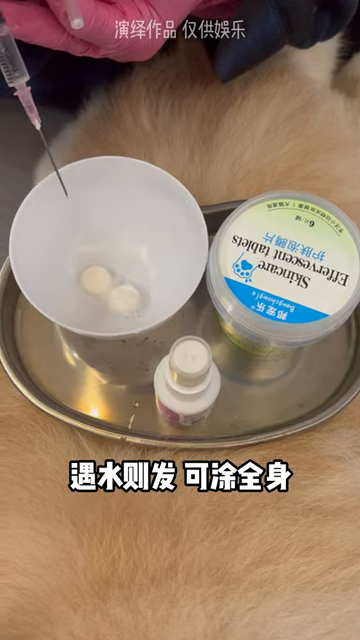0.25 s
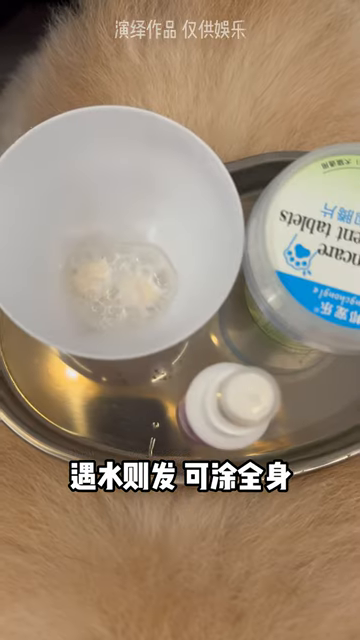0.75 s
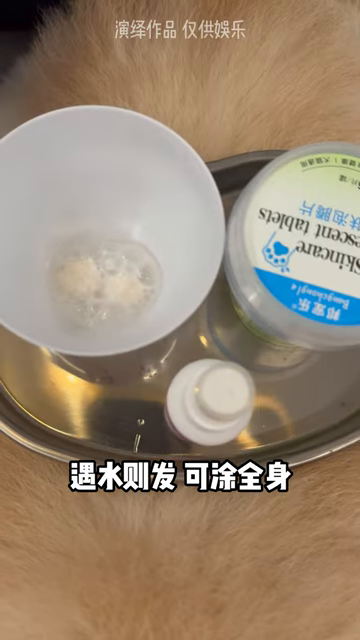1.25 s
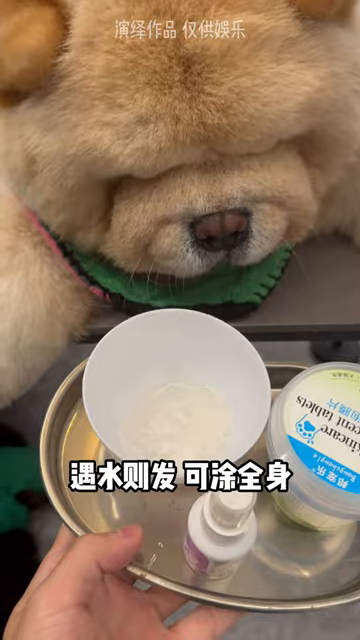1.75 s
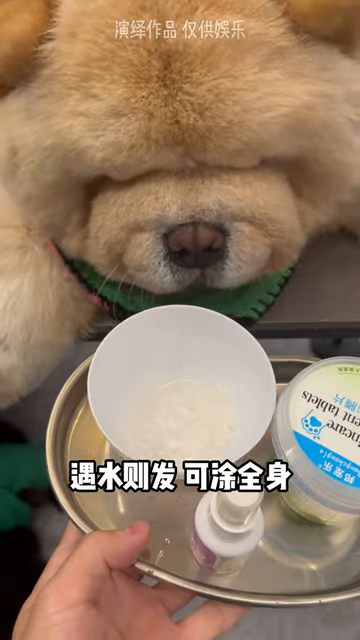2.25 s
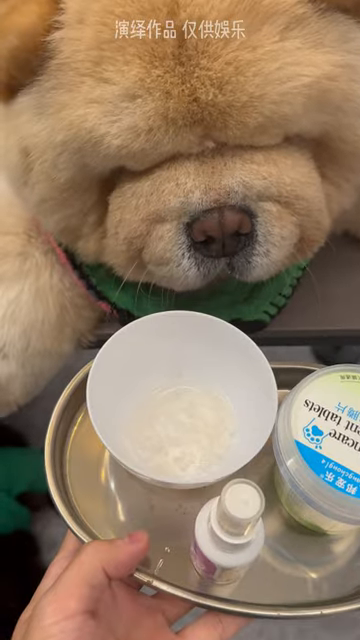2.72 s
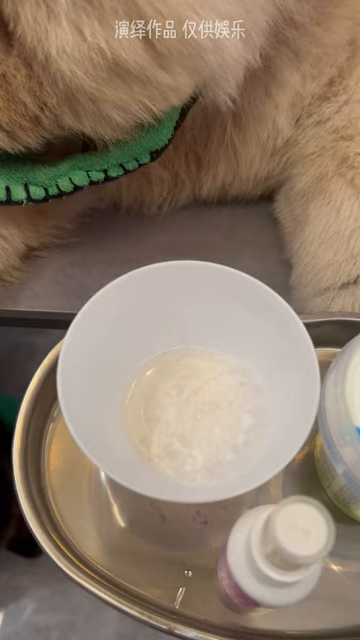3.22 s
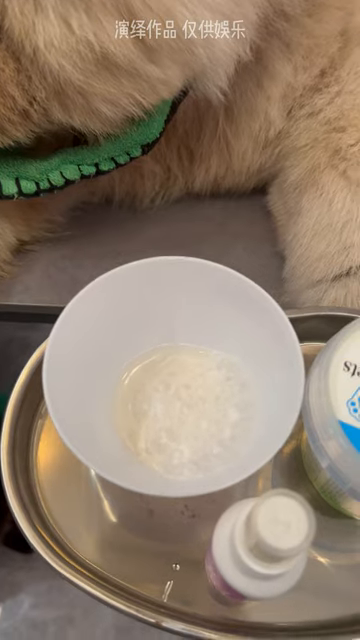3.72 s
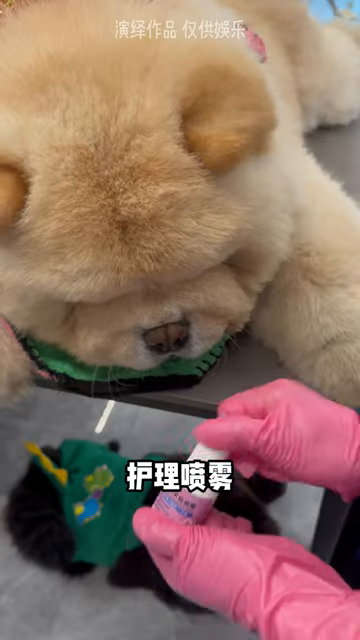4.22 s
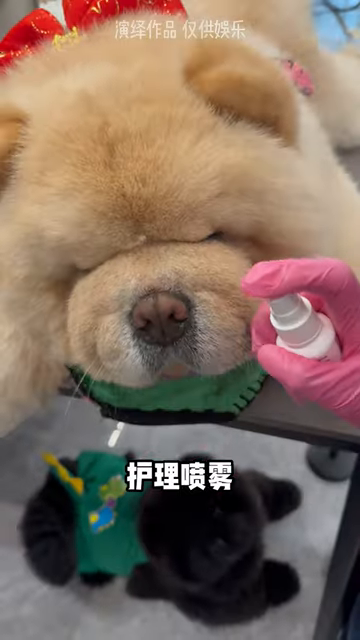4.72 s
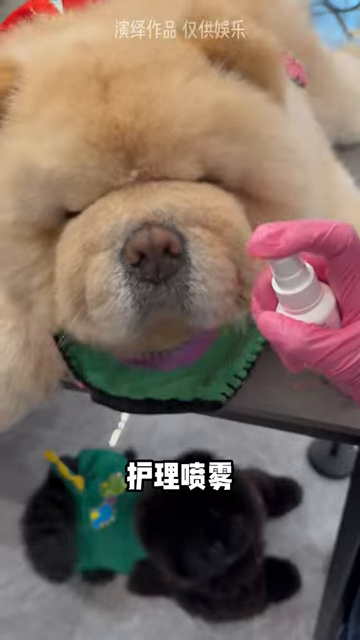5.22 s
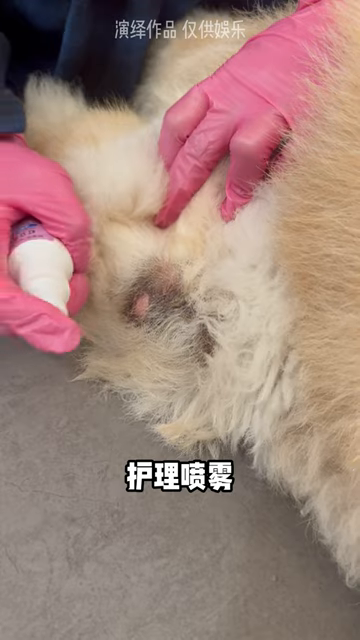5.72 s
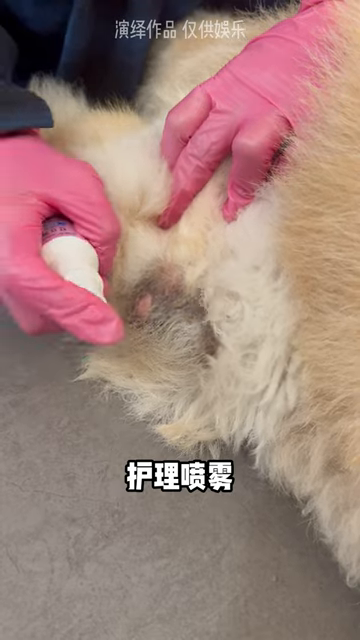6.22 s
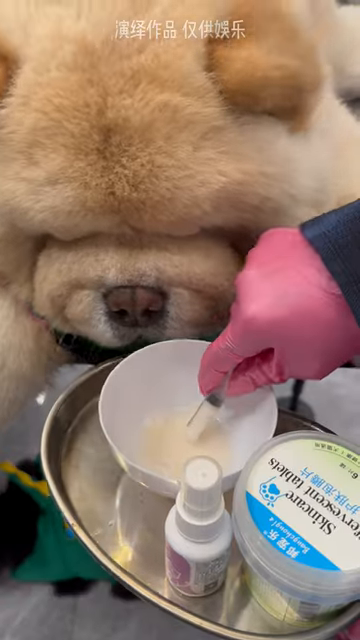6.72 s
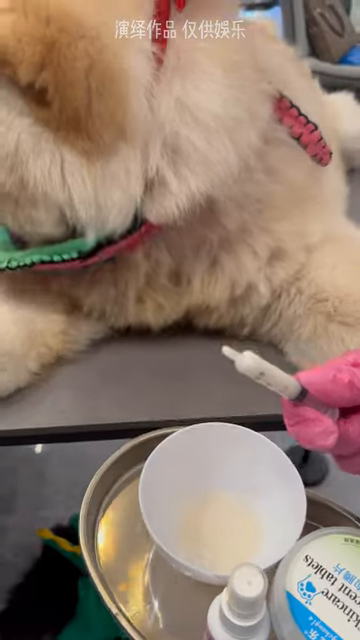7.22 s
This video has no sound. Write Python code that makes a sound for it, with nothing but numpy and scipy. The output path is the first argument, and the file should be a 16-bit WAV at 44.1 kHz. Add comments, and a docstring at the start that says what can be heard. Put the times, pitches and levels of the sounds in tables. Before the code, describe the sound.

Tablets fizz briskly in a shallow plastic bowl close to a hand-held stereo microphone, with low air buffeting, fan hum and faint dog grunts. The fizz weakens over abrupt shot changes. Then, in a quieter, slightly reverberant room, a bottle cap cracks loose, a pump gives four short puffs with small clicks, gloves rustle, and a low thump precedes a sputtering, gurgling syringe squirt.

```python
"""Tablets fizz in a shallow plastic bowl close to a hand-held stereo microphone, in several joined shots.
Air buffets the ports, a fan washes and hums behind, and a dog grunts; the fizz is random clicks, coloured.
Then, in a quieter room: a bottle cap snaps (noise blows ringing plastic modes), a pump bottle sprays four
puffs of mist (shaped noise), gloves rustle (scratchy grains), and after a low thump a syringe squirts
liquid and air into the bowl (ringing froth, single bubbles and low gurgles)."""
import sys
import numpy as np
from scipy import signal
from scipy.fft import rfft, irfft
from scipy.io import wavfile
from scipy.ndimage import uniform_filter1d

SR = 44100
rng = np.random.default_rng(int(sys.argv[2]) if len(sys.argv) > 2 else 0)


def unload_audio(sound):
    """Save the sound as a 16-bit wav file, at the path given as the first command line argument."""
    columns = np.transpose(np.atleast_2d(sound))
    # keep every value between -1 and 1, then stretch to whole-number steps
    steps = np.round(np.clip(columns, -1, 1) * 32767)
    wavfile.write(sys.argv[1], SR, steps.astype(np.int16))


def gain_from_db(level_db):
    """Convert decibel levels to linear amplitude factors (20 dB per decade)."""
    decades = np.asarray(level_db, float) / 20
    return 10 ** decades


N = 328941
T = np.arange(N) / SR

# Joins between shots, the louder room up to the third. Each entry: time in seconds.
JOINS = [.691, 1.9, 3.696, 3.99, 4.625, 6.458, 7.022, 7.199]


def evened(x):
    """Scales to rms 1."""
    return x / np.sqrt(np.mean(x ** 2) + 1e-20)


def read(points, hz):
    """Reads a table on a log-frequency axis."""
    f, value = np.transpose(points)
    return np.interp(np.log(hz + 1), np.log(f + 1), value)


def span(rows):
    """Sample times of a curve table and its columns at those times."""
    s, *columns = np.transpose(rows)
    t = np.arange(s[0], s[-1], 1 / SR)
    return (t, *(np.interp(t, s, c) for c in columns))


def add(mix, s, sound):
    """Adds a sound at time s."""
    part = mix[..., round(s * SR):][..., :sound.shape[-1]]
    part += sound[..., :part.shape[-1]]


def slow(count, size):
    """Slow random drift of rms 1."""
    return evened(uniform_filter1d(rng.standard_normal(count), size=size))


def patchy(depth_db, frames, bins):
    """A field of random louder and softer patches over time and frequency."""
    def field(hz, s):
        chance = rng.standard_normal((len(s), len(hz)))
        over_time = uniform_filter1d(chance, size=frames, axis=0)
        return depth_db * evened(uniform_filter1d(over_time, size=bins, axis=1)).T
    return field


def pops(count, per_s, spread_db):
    """Two trains of random clicks; a positive spread makes a few much larger than the rest."""
    size = gain_from_db(spread_db * np.minimum(rng.exponential(1, (2, count)), 5))
    struck = rng.random((2, count)) < per_s / SR
    return evened(size * rng.standard_normal((2, count)) * struck)


def pair(drive, colour, same, size=512, field_db=None):
    """Colours two drives and mixes them to left and right with the given likeness."""
    hz, t, z = signal.stft(drive, SR, nperseg=size, noverlap=size * 3 // 4)
    same = np.clip(read(same, hz), -.9, 1)[:, None]
    wide = np.array([np.ones_like(same), np.sqrt((1 - same) / (1 + same))])
    colour_db = read(colour, hz)[:, None]
    if field_db:
        colour_db = colour_db + field_db(hz[:, None], t)
    mid, side = z * wide * gain_from_db(colour_db)
    out = signal.istft(np.array([mid + side, mid - side]), SR, nperseg=size, noverlap=size * 3 // 4)[1]
    out = out[:, :drive.shape[1]]
    return out / np.sqrt(np.mean(out.mean(0) ** 2))


def resonate(x, hz, width):
    """A resonance of gain 1 that follows the curve hz."""
    turn = np.exp(2j * np.pi * np.cumsum(hz * np.ones(x.shape[-1])) / SR)
    r = np.exp(-np.pi * width / SR)
    return 2 * (turn * signal.lfilter([1 - r], [1, -r], x / turn)).real


def lead(x, s):
    """Makes the left channel earlier than the right by s seconds."""
    turn = np.exp(1j * np.pi * np.fft.rfftfreq(x.shape[1], 1 / SR) * s)
    return irfft(rfft(x) * [turn, 1 / turn], x.shape[1])


# The bowl held near, nearer, lifted and set down, one list a shot.
# Each row: time in seconds, fizz level in dB, lift of the treble in dB.
FIZZ_MOVES = [
    [(0, -28, 7), (.46, -23, -0.5), (.69, -23.5, -0.5)],
    [(.69, -23.5, -0.5), (1.2, -22.5, 0), (1.75, -22.5, -2)],
    [(1.75, -26, -2), (2.1, -29.5, -3), (2.97, -37.5, -1)],
    [(2.97, -39, 1), (3.2, -41, -1), (3.43, -45.5, -10), (3.47, -50, -3), (3.69, -50.5, -5),
     (3.70, -58.5, -0.5), (3.99, -58, -3)],
]
# Bubbles and bowl as heard at the microphone in each shot. Each row: frequency in Hz, level in dB per Hz.
FIZZ_COLOUR = [
    [(470, -59), (800, -24.5), (1320, -17), (2000, -5.5), (2380, -5), (3020, 1.5), (4180, 1), (11000, -10),
     (15200, -19), (16000, -33.5)],
    [(470, -54), (800, -26), (1080, -20.5), (1300, -13), (1950, -14.5), (2350, -5.5), (2700, -9.5),
     (3180, -1.5), (7000, -7), (10100, -5), (15200, -14.5), (16000, -38)],
    [(470, -39), (800, -19.5), (953, -23.5), (1180, -9), (1660, -14), (2000, -5.5), (2410, -8.5),
     (3470, -6.5), (4570, -6), (7000, -8.5), (9220, -0.5), (16000, -13.5)],
    [(530, -41.5), (900, -28), (1280, -2.5), (1700, -10), (1990, -8), (3230, -5.5), (3470, -5),
     (6800, -5.5), (9090, -0.5), (16000, -10)],
]
# Air modes of the bowl in each shot. Each row: frequency in Hz, width in Hz, lift in dB.
BOWL_MODES = [
    [(2053, 99, 4.5), (3080, 100, -1)],
    [(1300, 120, 1.5), (2500, 77, 6), (3040, 200, 5.5), (3660, 90, 4), (4170, 78, 6), (8430, 170, 4.5)],
    [(1170, 270, 2.5), (2000, 38, 4.5), (2500, 90, -1.5), (2900, 380, 5), (4050, 74.3, 0.5), (4900, 120, 0),
     (3520, 150, 10)],
    [(1990, 110, 4.5), (3430, 130, 3.5)],
]
# How much the fizz is shared by the two ports. Each row: frequency in Hz, likeness from -1 to 1.
FIZZ_SAME = [(60, -0.45), (180, 0.55), (550, 0.34), (1650, 0.9), (4970, 0.85), (9000, 0.57), (15000, 0.79)]
# Lean of the fizz. Each row: frequency in Hz, left over right in dB.
FIZZ_PAN = [(60, 2.0), (180, 1.0), (550, 2.0), (1650, -0.5), (4970, -0.42), (15000, 0.5)]
# The fizz reaches the left port first. Each entry, one a shot: lead in seconds.
FIZZ_LEAD = [0.000022, 0.000018, .5e-5, 1.1e-5]


def fizz():
    """Thousands of tiny bubbles burst each second; the bowl colours them, patches drift."""
    out = np.zeros((2, N))
    for rows, colour, modes, lead_s in zip(FIZZ_MOVES, FIZZ_COLOUR, BOWL_MODES, FIZZ_LEAD):
        t, db, treble_db = span(rows)

        def field(hz, s):
            treble = np.clip(np.log2(hz / 5000 + 1e-3), 0, 1)  # from 5 kHz, full at 10 kHz
            lift = np.interp(s + t[0], t, treble_db) * treble
            bowl = sum(lift_db / (1 + (2 * (hz - f) / width) ** 2) for f, width, lift_db in modes)
            return patchy(1.5, 12, 4)(hz, s) + lift + bowl
        bursts = pops(len(t), per_s=22000, spread_db=0)
        coloured = pair(bursts, colour, FIZZ_SAME, size=1024, field_db=field)
        add(out, t[0], gain_from_db(db) * lead(coloured, lead_s))
    hz = np.fft.rfftfreq(N, 1 / SR)
    lean = gain_from_db(read(FIZZ_PAN, hz) / 2)
    return irfft(rfft(out) * [lean, 1 / lean], N)


# Strength of the air on the ports. Each row: time in seconds, level in dB.
BUFFET = [(0.0, -20.5), (0.13, -29), (0.5, -30), (0.77, -18), (0.86, -31), (0.93, -21), (1.08, -23),
          (1.3, -30), (1.55, -25), (1.78, -31.5), (2.05, -29.5), (2.17, -27), (2.95, -35), (3.2, -30),
          (3.4, -29.5), (3.47, -20.5), (3.67, -17.5), (3.7, -39)]
# Low rumble of that air. Each row: frequency in Hz, level in dB per Hz.
BUFFET_COLOUR = [(4.7, -37.5), (8.0, 4), (22, 3), (29, -4.5), (43, -11.5), (86, -24), (110, -24),
                 (140, -47.5), (240, -120)]
LUMP_DB = 2  # random lumps of about 50 ms
BUFFET_LEAN_DB = 1.2  # left up and right down by this much


def buffet():
    """Lumpy low pressure, partly opposite on the two ports and stronger on the left."""
    t, db = span(BUFFET)
    air = pair(rng.standard_normal((2, len(t))), BUFFET_COLOUR, [(1, -.5)], size=8192)
    power = uniform_filter1d(uniform_filter1d(air.mean(0) ** 2, size=3000), size=3000)
    air = air / np.sqrt(power + 0.65)  # tames the strongest swells
    lumps_db = LUMP_DB * slow(count=len(t), size=2500)
    lean_db = np.array([[BUFFET_LEAN_DB], [-BUFFET_LEAN_DB]])
    out = np.zeros((2, N))
    add(out, 0, gain_from_db(db + lumps_db + lean_db) * air)
    return out


# Fan wash, a list for the loud shots, then one for the quiet. Each row: frequency in Hz, level in dB per Hz.
ROOM_COLOUR = [
    [(35, -33.5), (60, 3.5), (81, -7.5), (124, -7), (162, -2), (398, -10), (469, -20), (525, -14),
     (1200, -22.5), (1560, -47.5), (2640, -120)],
    [(12, -38), (20, -36), (54, -9), (90, -10), (123, -7.5), (217, -10), (380, -8.5), (423, -14.5),
     (599, -19.5), (783, -22), (944, -23.5), (12000, -69), (15600, -110), (22000, -120)],
]
# Its spread over the ports, loud then quiet shots. Each row: frequency in Hz, likeness from -1 to 1.
ROOM_SAME = [
    [(60, -0.29), (240, 0.81), (950, 0.34), (3770, 0.75), (15000, 0.31)],
    [(60, 0.92), (240, 0.96), (950, 0.11), (3770, 0.29), (15000, -0.38)],
]
# Level of the wash before its late rise. Each entry: level in dB, loud then quiet shots.
ROOM_LEVELS = [-44, -56]
# Fuzzy blade tones of the loud shots. Each row: frequency in Hz, level in dB, width in Hz.
FAN_TONES = [(216, -56, 6.9), (366, -54, 3.5), (415, -55, 7.1), (466.3, -51.5, 26)]
# Slow level of the hum. Each row: time in seconds, level in dB.
HUM = [(0.0, -57), (0.9, -53), (1.4, -47.5), (2.5, -50.5), (3.45, -45), (3.69, -55), (3.72, -55),
       (3.93, -61), (4.35, -56.5), (5.63, -60), (6.28, -70), (6.45, -62), (6.5, -57.5), (7.2, -59)]
HUM_HZ, HUM_WANDER_HZ = 121.8, 2.5
HUM_FLUTTER_DB = 6  # unsteady in the loud shots
LAST_ROOM_RISE_DB_PER_S = 41  # the wash grows through the last shot
LAST_HISS_DB = -66  # thin even hiss of the last shot


def room():
    """Fan wash with fuzzy blade tones in the loud shots and a hum that wavers."""
    out, loud = np.zeros((2, N)), T < JOINS[2]
    rise_db = LAST_ROOM_RISE_DB_PER_S * np.maximum(T - JOINS[-1], 0)
    for shots, db, colour, same in zip([loud, ~loud], ROOM_LEVELS, ROOM_COLOUR, ROOM_SAME):
        wash = pair(rng.standard_normal((2, N)), colour, same, size=2048)
        out += shots * gain_from_db(db + rise_db) * wash
    for hz, db, width in FAN_TONES:
        out += gain_from_db(db) * evened(resonate(rng.standard_normal((2, N)), hz, width)) * loud
    t, db = span(HUM)
    hz = HUM_HZ + HUM_WANDER_HZ * slow(count=len(t), size=3000)
    flutter = gain_from_db(HUM_FLUTTER_DB * slow(count=len(t), size=1800) * (t < JOINS[2]))
    add(out, 0, gain_from_db(db) * flutter * evened(np.sin(2 * np.pi * np.cumsum(hz) / SR)))
    return out + gain_from_db(LAST_HISS_DB) * rng.standard_normal((2, N)) * (T > JOINS[-1])


# Sharper puffs of air on the ports. Each row: centre in seconds, length in seconds, level in dB.
GUSTS = [(0.546, 0.082, -33), (1.86, .06, -39.5), (2.504, .06, -46), (3.199, .2, -39.5), (3.621, .14, -36)]
# Their colour. Each row: frequency in Hz, level in dB per Hz.
GUST_COLOUR = [(20, -18.5), (45, -0.5), (100, -4), (180, -14), (300, -29), (600, -83)]


def gusts():
    """Short brighter bursts of air, partly opposite on the two ports."""
    out = np.zeros((2, N))
    for s, length, db in GUSTS:
        air = pair(rng.standard_normal((2, 16384)), GUST_COLOUR, [(1, -.4)], size=4096)
        air = air[:, :round(length * SR)]
        add(out, s - length / 2, gain_from_db(db) * air * np.hanning(air.shape[1]))
    return out


# The dog grunts with its mouth shut.
# Each row: start in seconds, length in seconds, level in dB, pitch in Hz before start and sag.
GRUNTS = [(.9, 0.077, -37.5, 126), (1.171, 0.2, -31.5, 140.4), (3.25, .14, -37, 128.8)]
# Overtones of the grunt. Each row: multiple of the pitch, level in dB.
GRUNT_ORDERS = [(1, 0), (2, -16), (3, -27)]
GRUNT_EDGE_S, GRUNT_SAG_HZ_PER_S = 0.03, 90
GRUNT_START_HZ, GRUNT_SETTLE_S = 22, .03  # the pitch starts this much sharp and settles


def grunt():
    """A near-pure low tone with weak overtones; it swells, sags in pitch and fades."""
    out = np.zeros(N)
    for s, length, db, top_hz in GRUNTS:
        t = np.arange(0, length, 1 / SR)
        hz = top_hz - GRUNT_SAG_HZ_PER_S * t + GRUNT_START_HZ * np.exp(-t / GRUNT_SETTLE_S)
        turn = 2 * np.pi * np.cumsum(hz) / SR
        tone = sum(gain_from_db(level_db) * np.sin(k * turn) for k, level_db in GRUNT_ORDERS)
        swell = np.clip(np.minimum(t, length - t) / GRUNT_EDGE_S, 0, 1)
        add(out, s, gain_from_db(db) * evened(tone) * swell)
    return out


# In the tables of blows, octaves count to each side of the centre and decay is the time to fall 60 dB.
# The cap cracks loose and comes off.
# Each row: time in seconds, peak in dB, centre in Hz, width in octaves, decay in seconds.
CAP = [(4.066, -10, 5630, 1.7, 0.005), (4.253, -20, 2776, 1.9, .0053), (4.2565, -13, 2900, 1.8, 0.0078),
       (4.2631, -11, 4800, 1.6, 0.0068), (4.2692, -18.5, 2780, 0.62, 0.021)]
# The bottle is knocked as the cap gives. Each row: time in seconds, level in dB.
KNOCKS = [(4.067, -27), (4.256, -18)]
# What the bottle gives for a knock.
# Each row: dB from the knock, centre in Hz, width in octaves, decay in seconds.
BOTTLE = [(2, 1220, 0.63, .009), (-12.5, 268, 0.42, 0.015)]
# The pump head ticks when pressed. Each row: time in seconds, peak in dB.
PRESSES = [(4.672, -49), (5.145, -56), (5.686, -51), (6.126, -48.5)]
# It clicks when it springs back. Each row: time in seconds, peak in dB.
RETURNS = [(4.965, -45.5), (5.421, -49.5), (5.969, -40), (6.373, -40)]
# Sound of one press. One row: centre in Hz, width in octaves, decay in seconds.
PRESS = (3400, 1.5, .05)
# Sound of one return. One row: centre in Hz, width in octaves, decay in seconds.
RETURN = (2030, 1.3, .01)
# The piston jolts as a puff starts.
# One row: dB from the puff, centre in Hz, width in octaves, decay in seconds.
PISTON = (-5, 1300, 1, 0.34)
# Small ticks of plastic under gloved fingers.
# Each row: time in seconds, peak in dB, centre in Hz, width in octaves.
TICKS = [(3.727, -46, 1300, 0.77), (3.977, -38, 730, 0.66), (4.0583, -36.5, 5000, 0.48),
         (4.245, -32, 3000, 0.67), (4.46, -51, 3230, 0.29), (4.48, -46.5, 5060, .45),
         (4.985, -53, 7020, .8), (5.43, -50, 5000, 1.26), (6.667, -38.5, 3000, 1.7),
         (6.755, -62, 7200, 1.2), (6.964, -52.5, 7070, 1.4), (7.015, -55.5, 5000, 1.52),
         (7.173, -47.5, 6000, 0.71)]
TICK_S = 0.0052  # decay of a tick


def blows():
    """Every blow on plastic as (s, peak dB, centre Hz, octaves each side, decay s)."""
    bottle = [(s, db + part_db, *shape) for s, db in KNOCKS for part_db, *shape in BOTTLE]
    pump = [(*row, *PRESS) for row in PRESSES] + [(*row, *RETURN) for row in RETURNS]
    pump += [(s, db + PISTON[0], *PISTON[1:]) for s, db, *_ in PUFFS]
    return CAP + bottle + pump + [(*row, TICK_S) for row in TICKS]


# Modes of the hollow plastic, detuned a little at each blow.
# Each row: frequency in Hz, level in dB, time to fall 60 dB in seconds.
PLASTIC = [(750, -4, .012), (1100, 0, .012), (1600, -3, .008), (2200, -2, .007), (2900, 0, .007),
           (3800, -4, .006), (5000, -4, .005), (6900, -3, .004), (9500, -5, .003)]
CRACK = 1.5  # bare crack against the ringing


def snaps():
    """A ragged blow cracks around its centre and rings short plastic modes; also the room's even share.
    The room, fed from all sides of the object, receives the same energy with an even colour."""
    t, near, spread = np.arange(1024) / SR, np.zeros(N), np.zeros(N)
    hz, mode_db, t60 = np.transpose(PLASTIC)[:, :, None]
    for s, db, centre_hz, octaves, decay in blows():
        detune = rng.uniform(0.96, 1.1, hz.shape)
        blow = rng.standard_normal(len(t)) * gain_from_db(-60 * t / decay)
        ring = (gain_from_db(mode_db - 60 * t / t60) * np.sin(2 * np.pi * hz * detune * t)).sum(0)
        ring = ring / np.linalg.norm(ring)
        ring[0] = CRACK
        edges = np.clip(centre_hz * 2. ** (np.array([-1, 1]) * max(octaves, .2)), 150, 11500)
        band = signal.butter(2, edges, "band", fs=SR, output="sos")
        sound = signal.sosfilt(band, np.convolve(ring, blow))
        even = signal.sosfilt(band, 1. * (t == 0))
        sound = gain_from_db(db) * sound / abs(sound).max()
        add(near, s, sound)
        add(spread, s, even * np.linalg.norm(sound) / np.linalg.norm(even))
    return near, spread


# Gloves on fur and plastic.
# Each row: start in seconds, length in seconds, level in dB, change over the stroke in dB.
RUSTLE = [(3.99, 0.077, -70, -1), (4.4, .22, -65.5, -13), (4.63, .09, -80.5, 11), (4.93, 0.083, -77, 1),
          (5.128, .06, -81, -3), (5.402, 0.061, -78, -4.5), (5.66, 0.12, -71, -3), (5.957, .06, -61.5, -13),
          (6.077, 0.12, -76.5, 3), (6.361, 0.045, -67, -0.5), (6.457, 0.21, -63, -7), (6.674, .09, -61, -6),
          (6.78, .1, -77, -3), (6.962, 0.065, -73, 10), (7.027, 0.18, -66, -8.5)]
# Colour as it reaches the ear, thin from 12 to 13.8 kHz. Each row: frequency in Hz, level in dB per Hz.
RUSTLE_COLOUR = [(600, -22), (1100, -6), (2000, -6), (2900, -3), (3750, 0), (4900, -9), (6500, -4),
                 (9000, -7), (11000, -11), (12000, -34), (13800, -34), (14600, -21), (16000, -21)]


def rustle():
    """Soft scratchy grains while hands move."""
    out = np.zeros((2, N))
    same = [(1000, -0.072), (8000, 0.4), (15000, -0.57)]  # (Hz, likeness)
    for s, length, db, change_db in RUSTLE:
        t = np.arange(0, length, 1 / SR)
        clicks = pops(len(t), per_s=13000, spread_db=1.8)
        grains = pair(clicks, RUSTLE_COLOUR, same, field_db=patchy(2.9, 9, 12))
        add(out, s, gain_from_db(db + change_db * t / length) * grains * signal.windows.tukey(len(t), .2))
    return out


# Pump strokes.
# Each row: start in seconds, level in dB, length in seconds, swell over the stroke in dB.
PUFFS = [(4.78, -49, 0.046, 3.5), (5.24, -47.5, 0.044, -1.5), (5.776, -44.5, 0.04, 1),
         (6.199, -44, 0.041, -1.5)]
# Colour as it reaches the ear, thin from 12 to 13.6 kHz. Each row: frequency in Hz, level in dB per Hz.
PUFF_COLOUR = [(600, -26), (1400, -12), (2500, -5), (4900, -10), (5800, -4), (8500, -2), (11000, -3),
               (12000, -24), (13600, -24), (14300, -4), (16000, -6)]


def puffs():
    """Each stroke drives a short jet of mist through the nozzle: quick start, steady hiss, quick stop."""
    out = np.zeros((2, N))
    same = [(1000, 1.0), (8000, 0.44), (15000, -.3)]  # (Hz, likeness)
    for s, db, length, swell_db in PUFFS:
        t = np.arange(4000) / SR
        stop_db = -1500 * np.maximum(t - length, 0)
        shape = np.clip(t / 0.0022, 0, 1) * gain_from_db(swell_db * t / length + stop_db)
        hiss = pair(pops(len(t), per_s=9000, spread_db=1.1), PUFF_COLOUR, same)
        add(out, s, gain_from_db(db) * shape * hiss)
    return out


def bubble(hz, cycles, rise):
    """A dying sine with a soft start whose pitch rises."""
    t = np.arange(3000) / SR
    soft_start = 1 - np.exp(-(hz * t / 1.2) ** 2)
    return np.sin(2 * np.pi * hz * t * (1 + rise * hz * t)) * np.exp(-hz * t / cycles) * soft_start


# Liquid forced through the nozzle. Each row: time in seconds, level in dB, ringing of the froth in Hz.
SQUIRT = [(7.198, -50.5, 4600), (7.22, -52.5, 4300), (7.23, -48.5, 1590), (7.268, -36, 1900),
          (7.275, -24.5, 2260), (7.295, -24, 2510), (7.34, -33.5, 2000), (7.365, -37, 2880),
          (7.385, -34.5, 4050), (7.436, -46.5, 2710), (7.459, -42.5, 3630)]
# Colour of the froth. Each row: frequency in Hz, level in dB per Hz.
SQUIRT_COLOUR = [(120, -28), (200, -27), (558, -5.5), (1000, -8), (1100, -6.5), (1210, -8), (1870, -10.5),
                 (5130, -8.5), (7830, -22), (16000, -68)]
# Single bubbles. Each row: time in seconds, level in dB, starting pitch in Hz.
SPLATS = [(7.283, -20, 620), (7.292, -26, 2420), (7.3, -21, 2300), (7.31, -12, 2020), (7.324, -16, 1810),
          (7.344, -16, 3700), (7.374, -22, 4270), (7.391, -13, 3850), (7.41, -13.5, 3040),
          (7.427, -15, 3090), (7.433, -20.5, 2484)]
# The nozzle spits. Each row: time in seconds, strength in dB.
SPITS = [(7.274, -9), (7.286, -3), (7.295, -7), (7.306, -6), (7.312, -8), (7.344, -7), (7.427, -13)]
# A low thump before the squirt, then low gurgles in it.
# Each row: time in seconds, level in dB, starting pitch in Hz.
THUMP_AND_GURGLES = [(7.083, -25, 255), (7.387, -17, 231), (7.419, -16.5, 245), (7.445, -20, 230.5)]
SPIT_HZ = 4300


def squirt():
    """A low thump, then sputtering froth with a moving ring, single bubbles, nozzle spits and low gurgles."""
    t, db, hz = span(SQUIRT)
    clicks = pops(len(t), per_s=9000, spread_db=2.5)
    same = [(500, 1.0), (8000, 0.99)]  # (Hz, likeness)
    froth = pair(clicks, SQUIRT_COLOUR, same, size=256, field_db=patchy(3.4, 4, 9))
    froth = froth + gain_from_db(2.0) * resonate(resonate(froth, hz, 1300), hz, 1900)
    out = np.zeros((2, N))
    add(out, t[0], gain_from_db(db) * evened(froth))
    for s, db, hz in SPLATS:
        add(out, s, gain_from_db(db) * bubble(hz, cycles=3.2, rise=0.0052))
    for s, db in SPITS:
        add(out, s, gain_from_db(db) * bubble(SPIT_HZ, cycles=0.9, rise=0.01))
    for s, db, hz in THUMP_AND_GURGLES:
        add(out, s, gain_from_db(db) * bubble(hz, cycles=1.12, rise=0.023))
    return out


# Dying away of the room. Each row: frequency in Hz, time to fall 60 dB in seconds.
ECHO = [(300, 0.37), (1000, 0.44), (4000, 0.44), (8000, 0.35), (12000, 0.19)]


def echo(x):
    """Sparse taps of random sign, each band dying at its own speed."""
    taps = np.zeros((2, SR // 2))
    jitter = rng.integers(0, 20, (2, (SR // 2 - 201) // 20))
    at = np.arange(200, SR // 2 - 20, 20) + jitter
    np.put_along_axis(taps, at, rng.choice([-1., 1.], at.shape), 1)
    hz, t, z = signal.stft(taps, SR, nperseg=256)
    tail = signal.istft(z * gain_from_db(-60 * t / read(ECHO, hz)[:, None]), SR, nperseg=256)[1]
    return signal.fftconvolve(x[None], tail / np.linalg.norm(tail[0]), axes=1)[:, :N]


ECHO_DB = -14.5
SQUIRT_ECHO_DB = -10  # the last room is drier
SNAP_PAN_DB, SNAP_LEAD_S = 1.5, -2.2e-5  # left up and right down by this much; right port slightly first


def scene():
    """All sources; snaps, mist and squirt ring in the room and the snaps are louder on the left."""
    (snap, spread), mist, jet = snaps(), puffs(), squirt()
    room_tail = gain_from_db(ECHO_DB) * echo(spread + mist.mean(0) + gain_from_db(SQUIRT_ECHO_DB) * jet.mean(0))
    near = lead(snap * gain_from_db([[SNAP_PAN_DB], [-SNAP_PAN_DB]]), SNAP_LEAD_S) + mist + jet
    return near + room_tail + fizz() + buffet() + gusts() + room() + grunt() + rustle()


def band_limit(x):
    """A steep low-pass at the top of the band."""
    return signal.sosfilt(signal.butter(12, 16510, fs=SR, output="sos"), x)


def record(dry):
    """Joins the shots with a 5 ms fade out and in at each join."""
    fade = np.prod([np.clip(abs(T - s) / 0.005, 0, 1) for s in JOINS], axis=0)
    return band_limit(dry * fade)


dry = scene()
out = record(dry)
unload_audio(out)
```